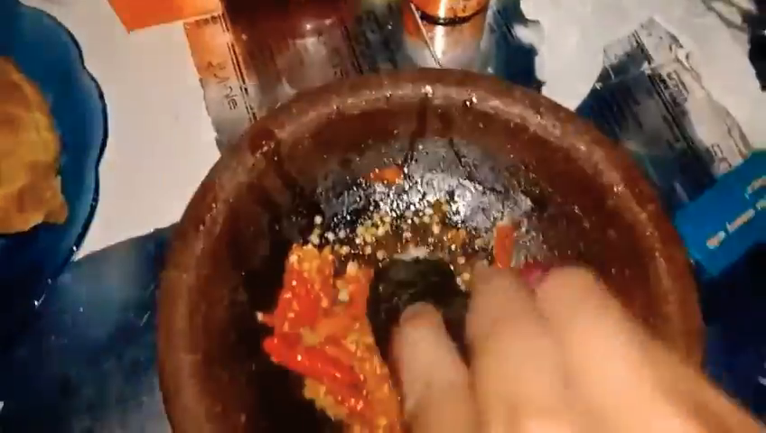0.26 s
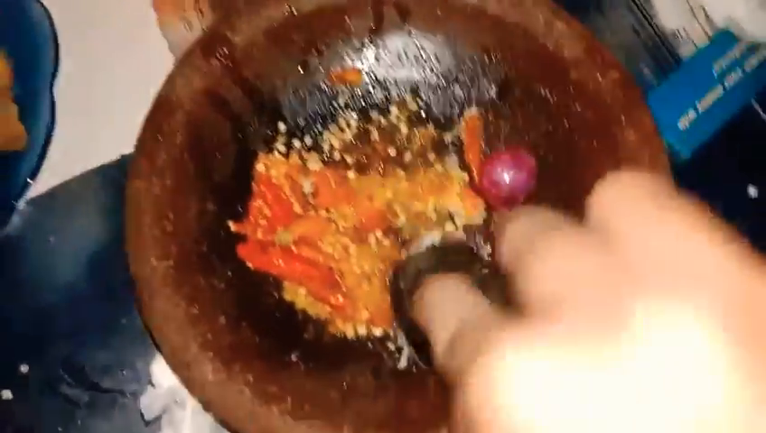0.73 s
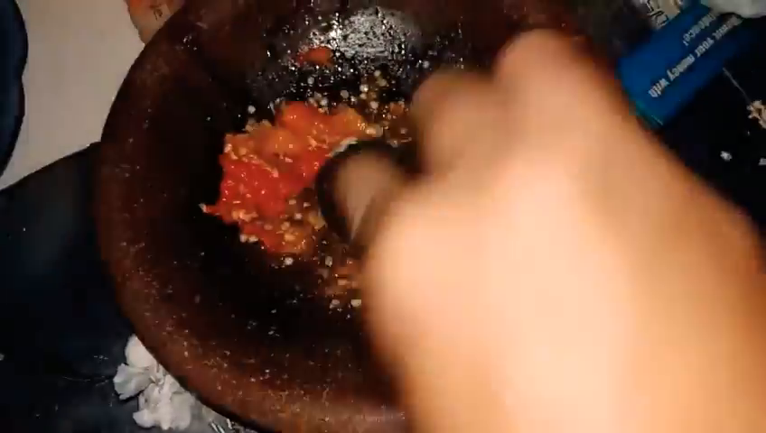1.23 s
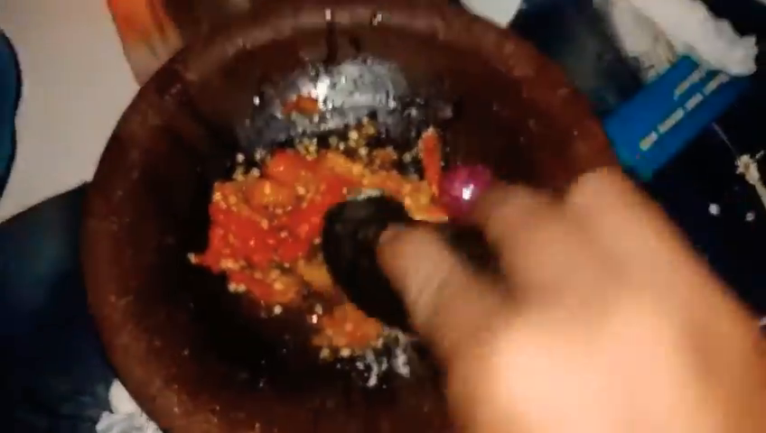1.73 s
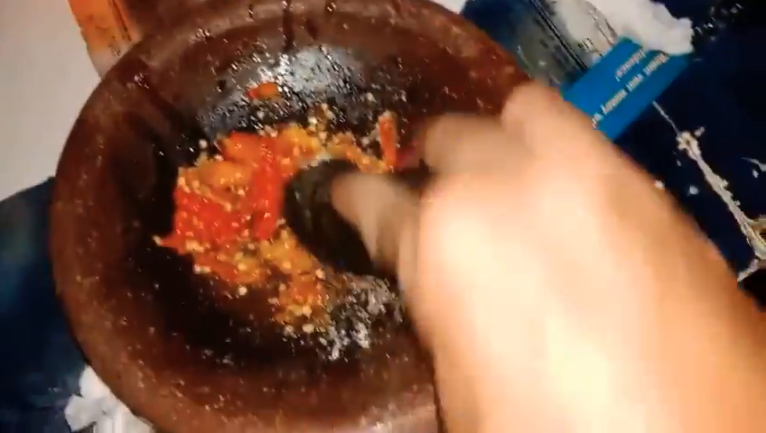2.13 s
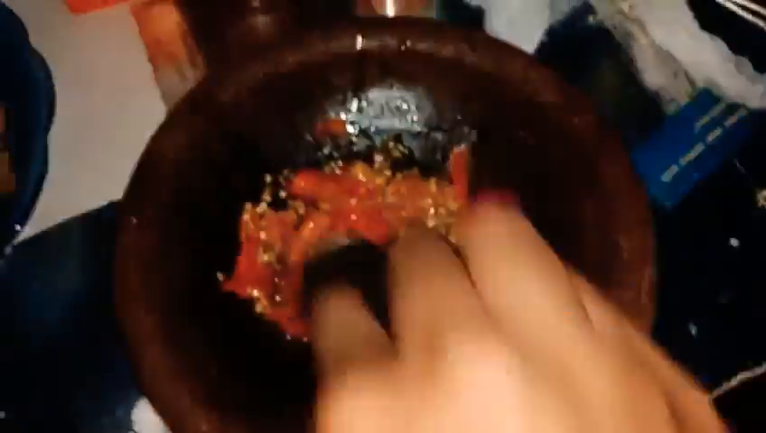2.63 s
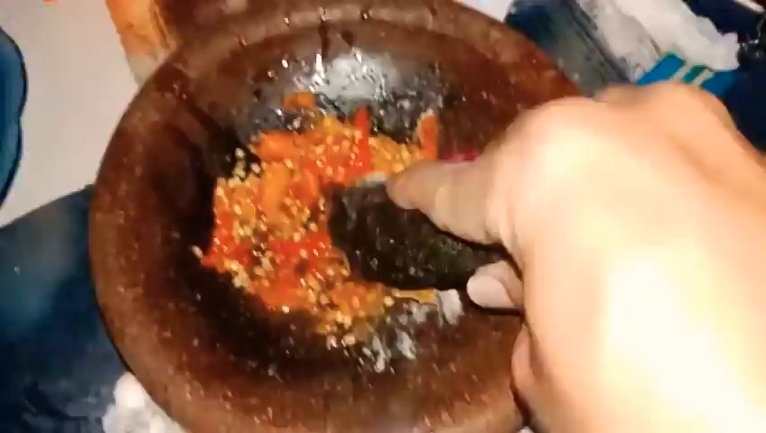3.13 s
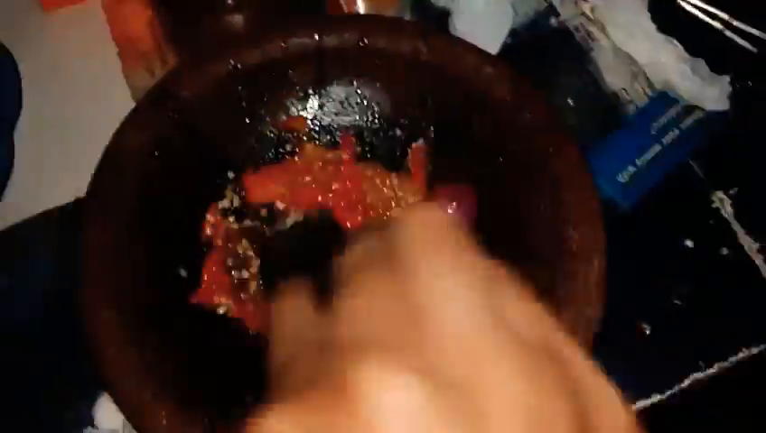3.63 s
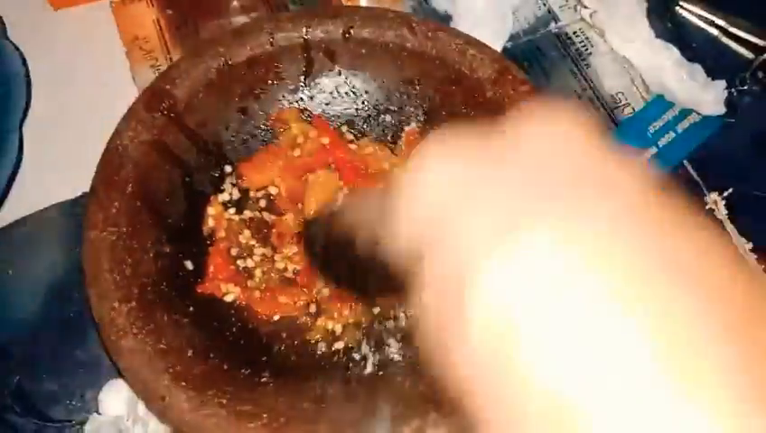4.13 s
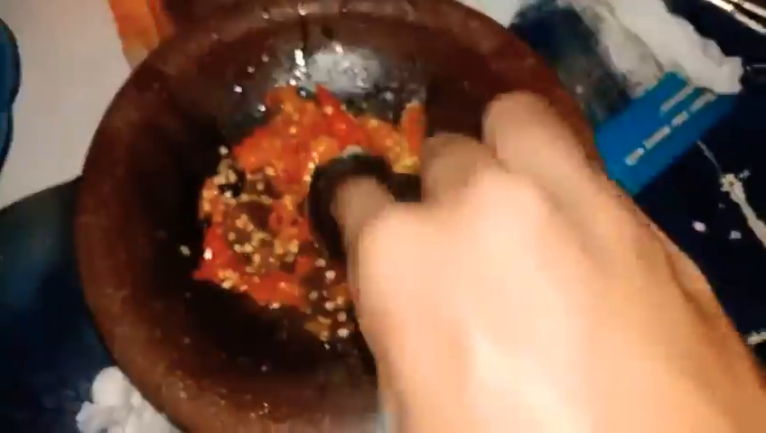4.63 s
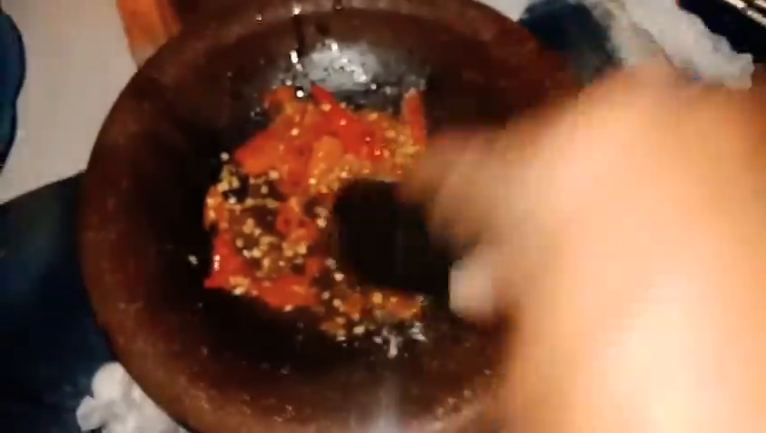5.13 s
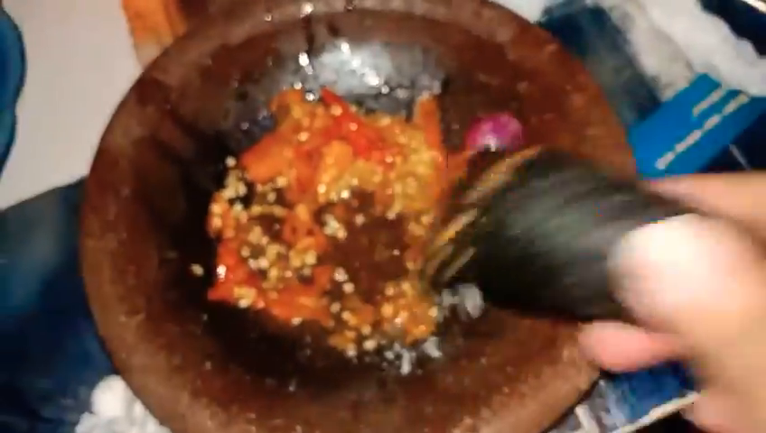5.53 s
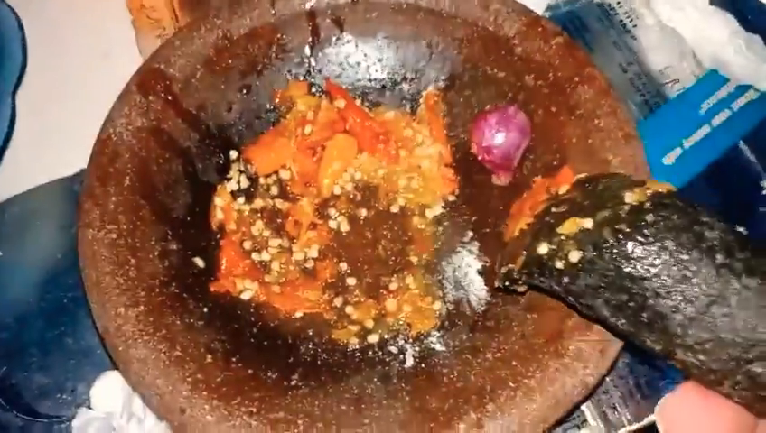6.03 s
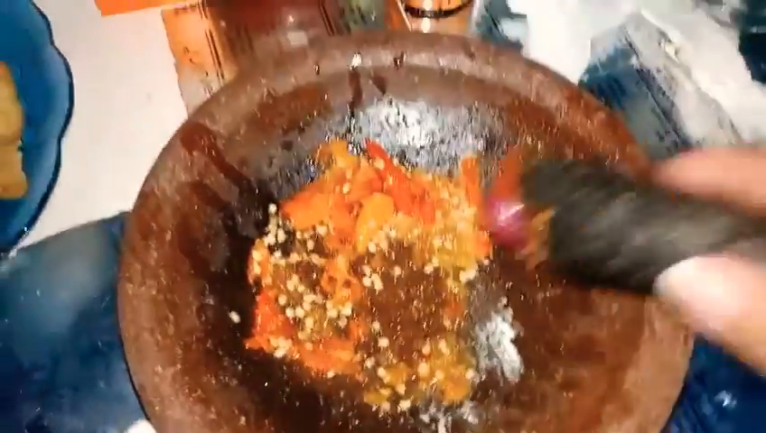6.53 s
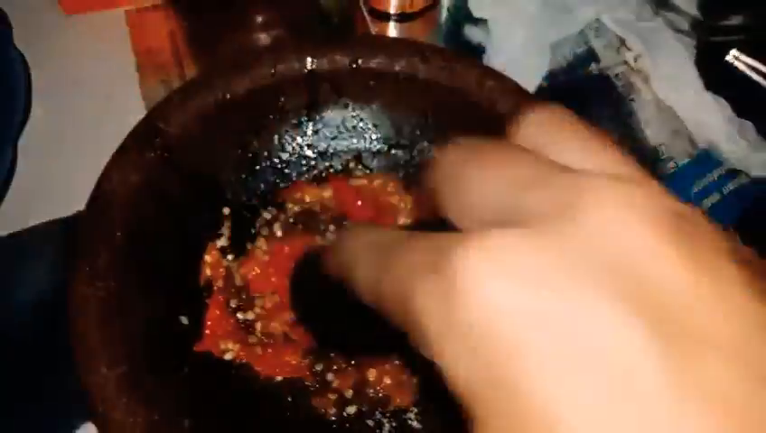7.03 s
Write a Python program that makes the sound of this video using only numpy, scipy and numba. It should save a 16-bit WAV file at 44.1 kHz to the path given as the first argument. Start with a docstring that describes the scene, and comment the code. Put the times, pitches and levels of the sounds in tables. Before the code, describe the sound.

Close up, a stone pestle crushes chillies and seeds in a heavy mortar. Gritty strokes come in short uneven bursts, with stony ringing, low table rumble and wet crackle. Occasional knocks thud and chink, and juice spits briefly. After about five and a half seconds the grinding stops; a finger rubs the phone on the left, then two soft scrapes follow. Small kitchen, faint air and low hum; right side clear, left muffled.

```python
"""A stone pestle grinds chillies and seeds in a stone mortar on a kitchen table, in short uneven strokes.
Grit catches and slips: random clicks ring the stone, rumble the table and crackle in the wet mash.
Now and then the pestle knocks, and juice spits as a short bright fizz; a small room tail follows.
A hand-held phone hears it close up: the right port open, the left muffled, with a finger brushing it in a pause.
Behind lie faint kitchen air and a wavering low hum, made of coloured noise."""
import sys
import numpy as np
from scipy import signal
from scipy.fft import rfft, irfft
from scipy.io import wavfile
from scipy.ndimage import uniform_filter1d, minimum_filter1d, map_coordinates
from numba import njit

SR = 44100
rng = np.random.default_rng(int(sys.argv[2]) if len(sys.argv) > 2 else 0)


def transcribe(u):
    """Save the signal u as a 16-bit wav file named by the first command-line argument.

    u: samples, shape (n,) or (channels, n), limited to [-1, 1]; the rate is SR.
    q: integer samples, one column per channel.
    """
    v = np.clip(np.atleast_2d(u).T, -1, 1)
    q = np.round(v * 32767).astype(np.int16)
    wavfile.write(sys.argv[1], SR, q)


N = 320663
TIME = np.arange(N) / SR


def undb(db):
    """Decibels to gain."""
    return 10 ** (np.asarray(db) / 20)


def unit(x):
    """Scale to an rms of 1."""
    return x / np.sqrt(np.mean(x ** 2))


def peak(x, db):
    """Scale to a peak level in dB."""
    return x * undb(db) / np.abs(x).max()


def steady(x, size=1300):
    """Even out the slow level and keep the fine grain."""
    power = uniform_filter1d(uniform_filter1d(x ** 2, size), size)
    return x / np.sqrt(np.abs(power) + 1e-12)


def walk(rate):
    """Random levels, rate a second, joined smoothly; spread near 1."""
    points = rng.standard_normal(8192)
    coarse = TIME[::32]
    smooth = map_coordinates(points, [coarse * rate], order=2, mode="wrap")
    return 1.18 * np.interp(TIME, coarse, smooth)


def colour(x, points, size=4096):
    """Causal minimum-phase filter through points of (f/Hz, level/dB)."""
    hz, db = np.transpose(points)
    bins_hz = np.arange(size // 2 + 1) * SR / size
    log_gain = np.interp(np.log(bins_hz + 1), np.log(hz), np.log(undb(db)))
    # folding the cepstrum forward in time makes the filter causal
    cepstrum = irfft(log_gain)
    cepstrum[1:size // 2] *= 2
    cepstrum[size // 2 + 1:] = 0
    impulse = irfft(np.exp(rfft(cepstrum)))
    return signal.fftconvolve(x, impulse)[:len(x)]


@njit
def resonate(x, hz, width):
    """State-variable band-pass whose centre may move; gain 1 at the centre."""
    y, band, low = np.empty(len(x)), 0., 0.
    for i in range(len(x)):
        g, damping = np.pi * hz[i] / SR, width / hz[i]
        g += g ** 3 / 3 + g ** 5 / 7.5  # close to tan(g)
        v = (band + g * (x[i] + 1e-18 - low)) / (1 + g * (g + damping))
        band, low, y[i] = 2 * v - band, low + 2 * g * v, damping * v
    return y


def ring(x, modes, bend=0.95):
    """Drive a set of modes (f/Hz, width/Hz, level/dB); bend multiplies their pitch."""
    return sum(undb(db) * resonate(x, hz * bend * np.ones(len(x)), float(width)) for hz, width, db in modes)


def grains(rate, spread_db):
    """Random clicks, rate a second: many small ones and a few large."""
    chance, size, sign = rng.random(N), rng.exponential(size=N), rng.choice([-1, 1], N)
    return (chance < rate / SR) * sign * undb(spread_db * np.minimum(size, 5))


def restless(x, depth_db, rate, count=11):
    """Let each half octave from 600 Hz up swell and fade on its own."""
    bins_hz = np.arange(N // 2 + 1) * SR / N
    place = np.clip(2 * np.log2((bins_hz + 1) / 600), 0, count - 1)
    spectrum = rfft(x)
    out = np.zeros(N)
    for k in range(count):
        band = irfft(spectrum * np.maximum(1 - np.abs(place - k), 0), N)
        out += band * undb(depth_db * walk(rate))
    return out


def add(track, s, sound):
    """Mix a sound into a track at a time in seconds."""
    start = int(s * SR)
    track[start:start + len(sound)] += sound[:N - start]


# modes of the stone bowl, before bending: (f/Hz, width/Hz, level/dB)
STONE_MODES = [(2690, 470, 3), (3290, 40, -17.5), (3166, 80, 17), (3080, 40, 2), (3296, 50, -40),
               (4460, 210, -1), (4580, 123, 0.5), (5300, 170, -28.5), (7180, 83, -32.5)]
# modes of the mortar on its table, before bending: (f/Hz, width/Hz, level/dB)
TABLE_MODES = [(120.3, 19, -3), (140.8, 34, 3.5), (159, 47, 1.5), (232.5, 17.6, 0.5), (281, 22, 0),
               (309.1, 19, -1.5), (349, 30, -4.5), (535, 87, -12), (674, 21, -68)]
# colour of stone scraping on grit: (f/Hz, level/dB)
CONTACT_COLOUR = [(200, -27.5), (480, -9), (780, -4), (1050, 2), (1330, 5.5), (1650, -1), (2200, 0),
                  (2700, 1.5), (3900, -7.5), (5200, -8), (6400, -21.5), (9000, -47), (15000, -37)]
# grit is crushed rather than struck, so little of its force reaches the top octave: (f/Hz, level/dB)
CRUSH_COLOUR = [(300, -5.5), (2000, -6.5), (2700, 6), (5200, -2.5), (6400, -21.5), (7800, -3),
                (9000, -21.5), (11000, -38), (15000, -32)]
# colour of wet cells bursting in the mash: (f/Hz, level/dB)
MASH_COLOUR = [(500, -22), (1500, -9), (3000, 1), (5000, 3), (6500, 0), (7900, 1), (8800, -8), (9900, -9),
               (10900, -20), (12300, -21), (15000, -27)]


def grinding():
    """The pestle sticks and slips over grit; every slip rasps the stone, shakes the table and bursts wet cells."""
    scrape_db, ring_db, rumble_db, wet_db = strokes()
    slips = undb(1.26 * walk(rate=150) + 2 * walk(rate=60))
    grit = grains(rate=2600, spread_db=2.5) * slips
    scrape = steady(restless(colour(grit, CONTACT_COLOUR), depth_db=2.0, rate=43))
    # the point of contact wanders, so each mode of the bowl swells and bends; the opening strokes ring lower
    bend = np.interp(TIME, [.31, .37], [.94, 1.01]) + 0.025 * walk(rate=9) + 0.02 * walk(rate=60)
    force = colour(grit, CRUSH_COLOUR)
    stone = steady(sum(undb(4.5 * walk(rate=22)) * ring(force, [mode], bend) for mode in STONE_MODES))
    # a light touch is cushioned by the mash and hardly rings the bowl
    cushion_db = 0.25 * np.minimum(ring_db + 20.5, 0)
    table = ring(grit, TABLE_MODES, 1 + 0.0094 * walk(rate=4.9))
    table_colour = [(30, -31), (70, -5.5), (130, -0.5), (300, 7.5), (450, 0.5), (700, -3.5),
                    (2000, -10), (8000, -68)]
    rumble = steady(colour(table, table_colour))
    # heavy pressure also rocks the whole mortar
    rocking = ring(grit, [(151.7, 5, 0)])
    rocking = steady(colour(rocking, [(40, -34.0), (145, 25), (300, -19), (1000, -38.0)]))
    rocking_db = rumble_db - 18.5 + .5 * np.minimum(rumble_db + 42.5, 0)
    cells = grains(rate=1600, spread_db=2.5) * slips
    mash = steady(restless(colour(cells, MASH_COLOUR), depth_db=6.5, rate=37))
    snaps = colour(seeds(), [(5000, 0), (8000, -5), (12000, -22)])
    return (scrape * undb(scrape_db + 6)
            + stone * undb(ring_db + 4.5 + cushion_db)
            + rumble * undb(rumble_db + 4)
            + rocking * undb(rocking_db)
            + mash * undb(wet_db + 7)
            + snaps * undb(wet_db + 24.5))


# pushes of the pestle: (start t/s, rise t/s, hold t/s, force level/dB, then level/dB above what is usual
# for that force: stone ring, table rumble, wet crackle)
STROKES = [ (0.0, 0.002, 0.031, -60, 3.5, 0, -16), (0.229, 0.044, 0.025, -31, 1, 3, 3.5),
           (0.343, 0.032, 0.09, -45, 2.5, 3, -19), (.598, 0.033, 0.047, -35, -1.5, 0, 5),
           (0.741, 0.035, 0.088, -51, 11, 5, 1), (0.861, 0.026, 0.041, -32, 3.5, 2.5, 2.5),
           (1.173, 0.0029, 0.054, -35.5, 3.5, 5, 5.5), (1.259, 0.019, 0.0093, -44.5, -2, 2, 0),
           (1.381, 0.027, 0.029, -58.5, 8, 1, 4.5), (1.503, 0.0098, 0.035, -48, 3.5, -1, 2.5),
           (1.545, 0.014, 0.014, -36.5, 2, 1, -1), (1.629, 0.019, 0.052, -41, 4.5, 1, -1.5),
           (1.709, 0.086, 0.069, -45, 2, 1.5, -1.5), (2.046, 0.036, 0.1, -29.5, 2, 0, 4),
           (2.274, 0.03, 0.021, -39.5, 5, 0.5, 2.5), (2.378, 0.034, 0.019, -31.5, 0, -1, 7.5),
           (2.66, 0.048, 0.1, -56, 7, -3.5, 1), (2.816, 0.026, 0.01, -50, 7, 0.5, -4),
           (2.903, 0.045, 0.052, -65.5, 9, 4, 7.5), (3.051, 0.016, 0.066, -34, -0.5, -1, 1.5),
           (3.163, 0.057, 0.084, -49.5, 3, 2, 0), (3.336, 0.034, 0.037, -36, -2.5, 1, 2.5),
           (3.617, 0.059, .06, -51.5, 1, -0.5, -4.5), (3.762, 0.041, 0.027, -62, 11.5, 2, 0),
           (3.86, 0.051, 0.019, -60, 11, -1, -3), (3.918, 0.029, 0.036, -55.5, -7, -4, 2.5),
           (4.019, 0.052, 0.047, -40.5, -1.5, -1, -1.5), (4.177, 0.043, 0.012, -44.5, 4.5, -1.5, 3.5),
           (4.246, 0.026, 0.011, -55, 6, 4, 0), (4.324, 0.024, 0.0042, -42, 2.5, -2, 2),
           (4.364, 0.03, 0.012, -38.5, -2, 0.5, -0.5), (4.58, 0.062, 0.087, -53, 4.5, 2, -0.5),
           (4.762, 0.022, 0.021, -46.5, -11, -4, -2), (4.817, 0.023, 0.013, -54, 11.5, 2.5, -6),
           (4.902, .012, 0.039, -36, -1.5, -0.5, 5), (5.04, 0.034, 0.014, -40, 5, -0.5, 2.5),
           (5.14, 0.032, 0.012, -30.5, -0.5, -4, 2.5), (5.394, 0.004, 0.031, -41.5, -11, 5.5, -29),
           (5.439, 0.018, 0.025, -37, 3.5, 0, -4), (6.58, 0.061, 0.045, -58, 4.5, -1.5, 2.5),
           (6.937, 0.086, 0.11, -54.5, 0, -4.5, -9)]
# spells when the pestle also drags lightly through the mash: (from t/s, to t/s)
DRAGGING = [(.2, 2.6), (2.669, 3.6), (4.6, 5.58), (6.92, 7.5)]
# that drag before the layers are balanced in the mix: (scrape, stone ring, table rumble, wet crackle level/dB)
DRAG_DB = (-64, -65, -65, -74)
# ring and rumble over the force, before the same balance
RING_DB, RUMBLE_DB = 3.5, 6.5
# crackle at a firm push, before the same balance, and its growth with force in dB per dB
FIRM_DB, WET_DB, WET_GROWTH = -25, -47, 0.43
# the table rumbles on a little longer: speed of its fall as a share of the stone's
RUMBLE_RELEASE = 0.75


def strokes(size=220):
    """Levels in dB of scrape, stone ring, table rumble and wet crackle: all follow the force of each push."""
    dragging = sum((TIME >= start) & (TIME < end) for start, end in DRAGGING)
    power = undb(DRAG_DB)[:, None] ** 2 * dragging + 1e-10
    for start, rise, hold, force_db, ring_db, rumble_db, wet_db in STROKES:
        span = slice(max(int(start * SR), 0), int((start + 1) * SR))
        since = TIME[span] - start
        stone = push_shape(since, rise, hold, speed=1)
        table = push_shape(since, rise, hold, speed=RUMBLE_RELEASE)
        crackle_db = WET_DB + WET_GROWTH * (force_db - FIRM_DB) + wet_db
        power[:, span] += np.square([stone * undb(force_db),
                                     stone * undb(force_db + RING_DB + ring_db),
                                     table * undb(force_db + RUMBLE_DB + rumble_db),
                                     stone * undb(crackle_db)])
    return uniform_filter1d(10 * np.log10(power), size, axis=1)


# a push swells by SWELL_DB, sags while it is held, then falls away; the mash settles more slowly after it
SWELL_DB, SAG_DB_PER_S, RELEASE_DB_PER_S = 16, 9, 476
SETTLE_DB, SETTLE_DB_PER_S = -19.5, 171


def push_shape(since, rise, hold, speed):
    """Gain of one push: swell, hold, then a quick release over a slow settling; speed scales both falls."""
    after = np.maximum(since - rise - hold, 0) * speed
    swell_db = -SWELL_DB * np.clip(1 - since / abs(rise), 0, 1)
    held_db = -SAG_DB_PER_S * np.clip(since - rise, 0, abs(hold))
    release_db = np.maximum(-RELEASE_DB_PER_S * after, SETTLE_DB - SETTLE_DB_PER_S * after)
    return undb(swell_db + held_db + release_db)


def seeds(count=560, size=700):
    """Single seeds and salt grains snap as short decaying sines, each with its own pitch and size."""
    out, t = np.zeros(N), np.arange(size) / SR
    for when, pitch, strength in rng.random((count, 3)):
        hz = 2300 * 2.6 ** pitch
        snap = np.sin(2 * np.pi * hz * t) * np.exp(-hz * t / 3)
        add(out, when * (N - 1) / SR, undb(-12 * strength) * snap)
    return out


# the pestle lands or cracks a seed: (t/s, thud level/dB, thud f/Hz, clack level/dB, chink level/dB)
KNOCKS = [(.196, -14, 318, -28.5, -29), (.252, -29, 327, -51, -23), (.49, -22.5, 310, -28.5, -18),
          (.579, -23, 128, -36, -29.5), (0.775, -47, 151, -38, -21), (.804, -29.5, 300.8, -62, -23.5),
          (1.176, -10, 229, -10, -9), (1.213, -25, 270, -16.5, -17), (1.247, -27, 140, -21, -11),
          (2.051, -19, 140, -33, -18), (2.074, -12, 151, -29, -23), (2.111, -9, 291, -33, -17),
          (2.161, -39, 190, -14, -15), (2.343, -23, 206, -58, -14), (2.403, -15.5, 254, -42, -5),
          (3.008, -33, 140, -65, -52), (3.069, -18, 233, -27, -13), (3.302, -51, 127, -50, -21.5),
          (4.397, -38, 290, -43, -25), (4.584, -25.5, 136, -72, -41), (4.795, -35, 164, -56, -27),
          (4.909, -28, 284, -35, -20), (5.397, -11.5, 237, -7, -17), (7.1, -41, 258, -60, -42)]
# short modes of a blow on bare stone, before bending: (f/Hz, width/Hz, level/dB)
BLOW_MODES = [(570, 62, 1), (710, 26.8, -23), (953, 63, 9.5), (1115, 180, 24), (1340, 45, 0.5),
              (1750, 70, -4.5), (2215, 60, -11)]
# modes of the pestle, ringing on after a hard landing, before bending: (f/Hz, width/Hz, level/dB)
PESTLE_MODES = [(4485, 96, 2.5), (4650, 15, -46), (5970, 50, -9), (6640, 240, -24)]
# colour of the clack: (f/Hz, level/dB)
CLACK_COLOUR = [(200, -30.5), (700, -1.5), (1150, -1), (1800, -0.5), (2400, -15), (4200, -37), (7000, -63),
                (15000, -57.5)]


def knocks(size=13000):
    """A blow rocks the mortar on the table (slower when the mash cushions it); bare stone adds a clack and a chink."""
    out, t = np.zeros(N), np.arange(size) / SR
    tap = colour(1. * (t == 0), [(3000, 12.5), (6000, -11.5), (9000, -10.5), (15000, -38.5)])
    blow = peak(ring(tap, BLOW_MODES), 0)
    pestle = ring(tap, PESTLE_MODES)
    for s, thud_db, thud_hz, clack_db, chink_db in KNOCKS:
        push = np.sin(2 * np.pi * thud_hz * t) * t * np.exp(-1.1 * thud_hz * t)
        push = colour(push, [(25, -26), (60, -13), (130, 0)])
        thud = peak(push, 0) + peak(ring(push, TABLE_MODES), -18)
        # grains under the tip break in a short crack and a faint crumbling after it
        crack = rng.standard_normal(size) * (np.exp(-t / .0018) + .16 * np.exp(-t / .018))
        clack = blow + peak(colour(crack, CLACK_COLOUR), 0)
        bowl = ring(colour(crack, CRUSH_COLOUR), STONE_MODES, bend=1.01)
        chink = peak(bowl, 0) + peak(colour(crack, CONTACT_COLOUR), -5)
        # the pestle rings most after the hardest landings
        pestle_db = .7 * clack_db + .3 * chink_db - 5
        add(out, s, peak(thud, thud_db) + peak(clack, clack_db) + peak(chink, chink_db) + peak(pestle, pestle_db))
    return out


# juice spits from under the pestle: (t/s, peak level/dB)
SQUIRTS = [(1.175, -20.5), (2.052, -21), (2.984, -34), (3.07, -23), (3.798, -31.5), (3.969, -34),
           (4.208, -28), (4.394, -24)]


def squirts(size=3000):
    """Juice spits from under the pestle in a short bright fizz: a burst of spiky noise."""
    out, t = np.zeros(N), np.arange(size) / SR
    for s, db in SQUIRTS:
        fizz = rng.standard_normal(size) ** 3 * t * np.exp(-t / 0.0017)
        fizz = colour(fizz, [(1500, 6), (4000, 19), (7000, 13), (10000, -21), (15000, -12)])
        add(out, s, peak(fizz, db))
    return out


# a finger catches on the phone's case: (t/s, peak level/dB)
FINGER = [(5.961, -23), (5.9711, -25), (5.9782, -16), (5.985, -20.5), (6.002, -27.5), (6.058, -31.5),
          (6.083, -31), (6.093, -30), (6.150, -30), (6.176, -30), (6.187, -30.5)]


def finger(size=900):
    """Skin catches on the case next to the left port: dull pops over a faint rub."""
    out, t = np.zeros(N), np.arange(size) / SR
    for s, db in FINGER:
        # the pitch of each pop falls to 170 Hz as the skin lets go
        glide = 0.27 * np.exp(0.5 * rng.standard_normal())
        turns = 170 * t + glide * (1 - np.exp(-t / 0.00093))
        add(out, s, peak(-np.sin(2 * np.pi * turns) * np.exp(-t / 0.0016), db))
    pressure = np.interp(TIME, [5.93, 5.975, 6.01, 6.13, 6.175, 6.21], [0.049, 1, 0.37, 0.21, 0.61, 0.049])
    rub = grains(rate=700, spread_db=4.0)
    rub = colour(rub, [(60, 2), (300, -1.5), (1000, -5.0), (2500, -22.5), (8000, -45.0)])
    return out + undb(-37.5) * pressure * unit(rub)


def room(x, wet_db, t60=0.26, size=22000):
    """The table top and the small kitchen answer with a short noise tail, different at each port; t60 in s."""
    t = np.arange(size) / SR
    tail = rng.standard_normal(size) * undb(-60 * t / t60) * np.clip(t / 0.00077, 0, 1)
    tail = colour(tail / np.linalg.norm(tail),
                  [(80, -7), (150, -3), (400, -6), (1000, 1), (3500, 1), (8000, -4), (15000, -10)])
    return undb(wet_db) * signal.fftconvolve(x, tail)[:N]


# colour of the kitchen air, before each port's own colour: (f/Hz, level/dB)
KITCHEN_COLOUR = [(18, -75), (30, 2), (129, 13.5), (612, -9), (794, -2.5), (928, -9), (1090, -16),
                  (1240, -18.5), (1830, -12.5), (2080, -19), (4200, -23.5), (7060, -36.5), (15000, -50)]
# a low hum comes and goes, 2 dB above these levels: (t/s, level/dB)
HUM = [(.15, -70), (1.05, -58), (2.6, -61.5), (3, -53), (3.9, -53), (4.5, -64), (5.85, -52.5),
       (6.35, -67.5), (7.25, -61.5)]


def background():
    """Faint kitchen air with a wavering low hum, the air fading in at the start; the ports hiss a little."""
    shared, left, right = (colour(rng.standard_normal(N), KITCHEN_COLOUR) for _ in range(3))
    air = unit(shared) * 0.46 + np.array([unit(left), unit(right)]) * 0.77
    air[0] = colour(air[0], [(200, -11.5), (1000, -4.5), (2500, 7.5), (5000, 3.5), (12000, 16)])
    air[1] = colour(air[1], [(200, -4.5), (1000, 8.0), (2500, 13), (5000, 14.0), (12000, -9)])
    fade_db = np.interp(TIME, [.15, .7], [-8, 0])
    air_db = -54 + fade_db + 0.84 * walk(rate=3.478)
    # noise through two resonances in a row; the default bend puts both at 133 Hz
    hum = ring(ring(rng.standard_normal(N), [(140, 22, 0)]), [(140, 50, 0)])
    hum_db = np.interp(TIME, *np.transpose(HUM)) + 2
    hiss = undb(-73.5) * rng.standard_normal((2, N))
    return air * undb(air_db) + steady(hum, size=3000) * undb(hum_db) + hiss


# the muffled left port of the phone: (f/Hz, level/dB)
LEFT_PORT = [(60, -2.5), (200, -3), (380, -4.5), (700, -7), (1290, -16), (2380, -22), (3000, -23),
             (4400, -30), (8000, -36), (15000, -36)]


def scene():
    """The right port hears the mortar openly, the left one dull, a little late and with more of the room."""
    mortar = grinding() + knocks() + squirts()
    late = np.interp(TIME - .00014, TIME, mortar)  # 0.14 ms
    left = colour(late + room(mortar, wet_db=-9), LEFT_PORT) + finger()
    right = mortar + room(mortar, wet_db=-12)
    return np.array([left, right]) + background()


TOP_HZ = 15200


def record(dry):
    """The phone holds back the highest peaks for a few milliseconds and cuts the top."""
    needed = np.minimum(1, .8 / (np.abs(dry).max(axis=0) + 1e-9))
    gain = uniform_filter1d(minimum_filter1d(needed, size=300), size=300)
    low_pass = signal.ellip(8, .2, 70, TOP_HZ, fs=SR, output="sos")
    return signal.sosfilt(low_pass, dry * gain)


dry = scene()
out = record(dry)
transcribe(out)
```